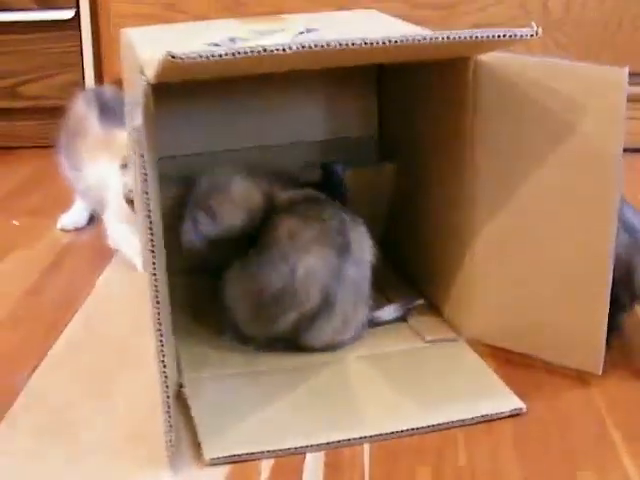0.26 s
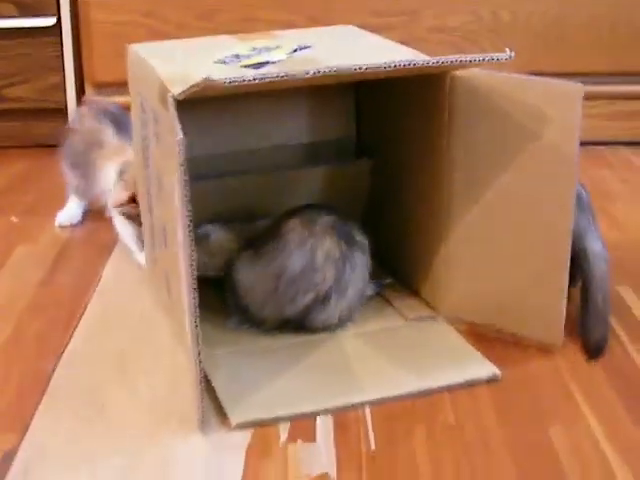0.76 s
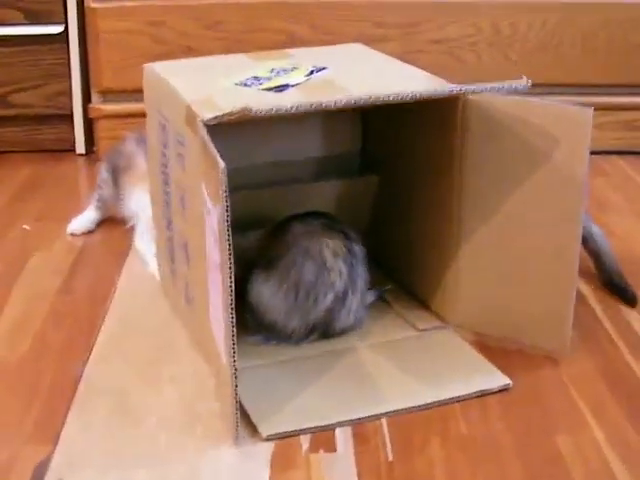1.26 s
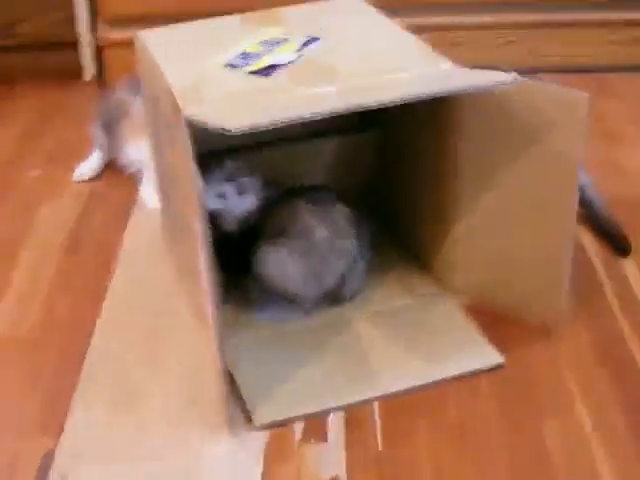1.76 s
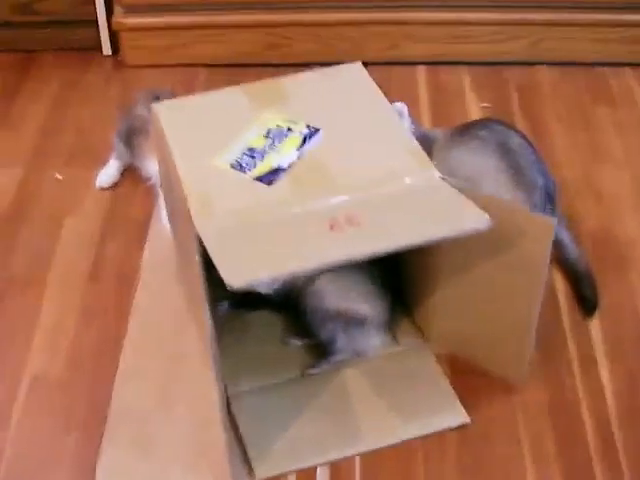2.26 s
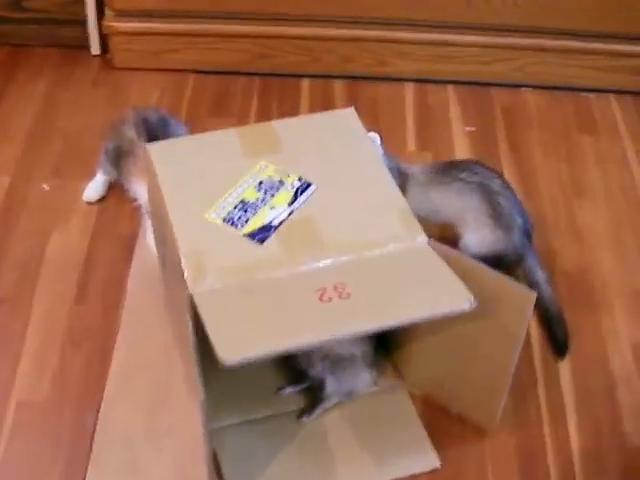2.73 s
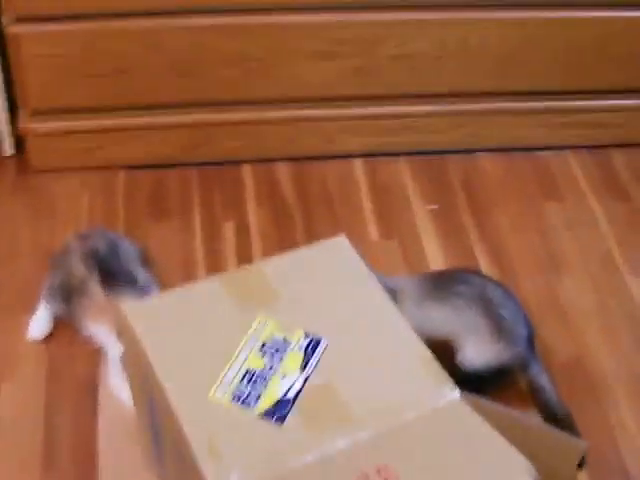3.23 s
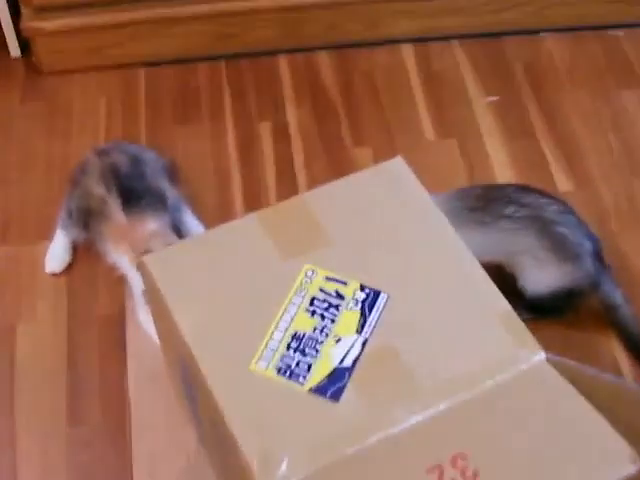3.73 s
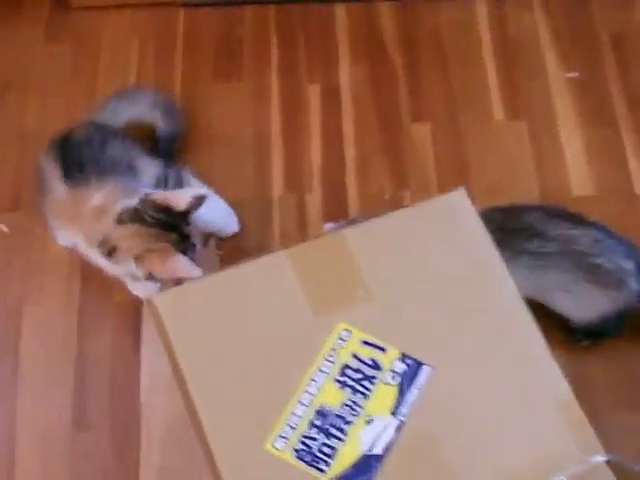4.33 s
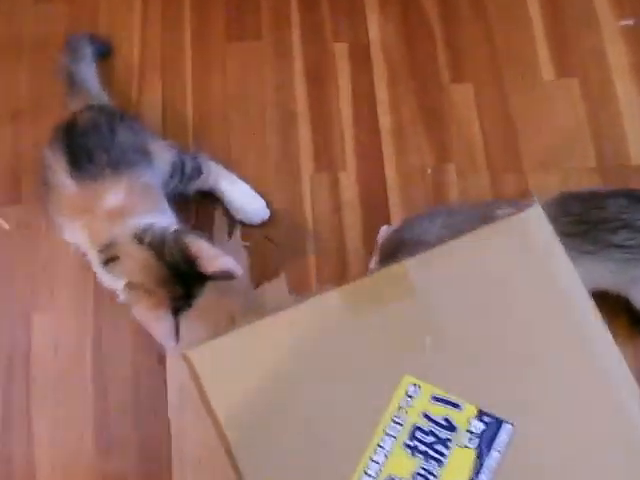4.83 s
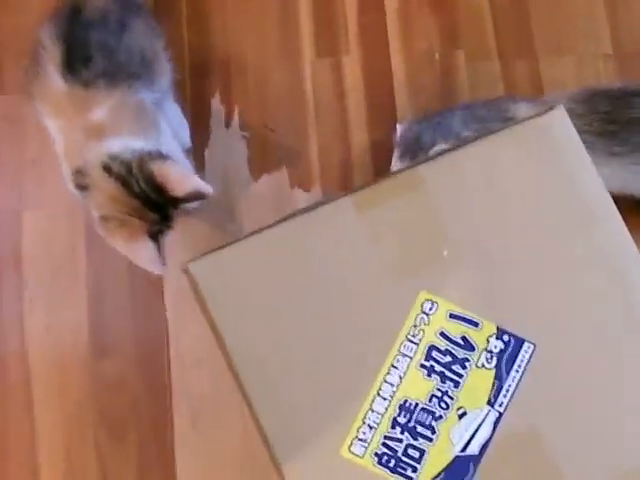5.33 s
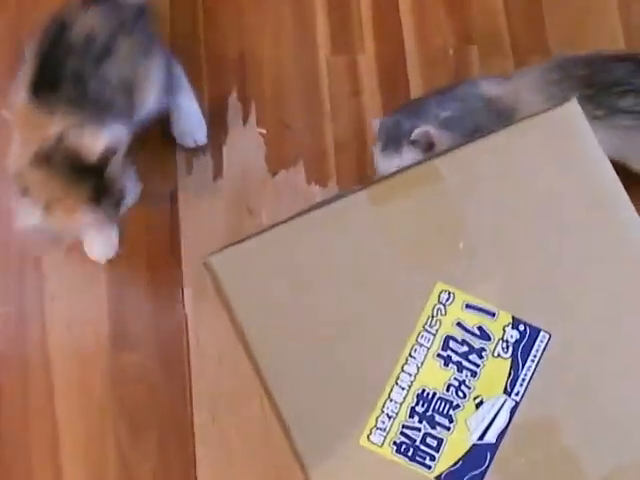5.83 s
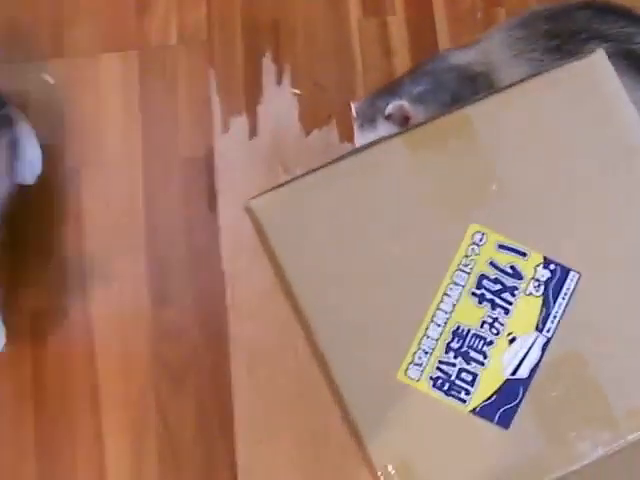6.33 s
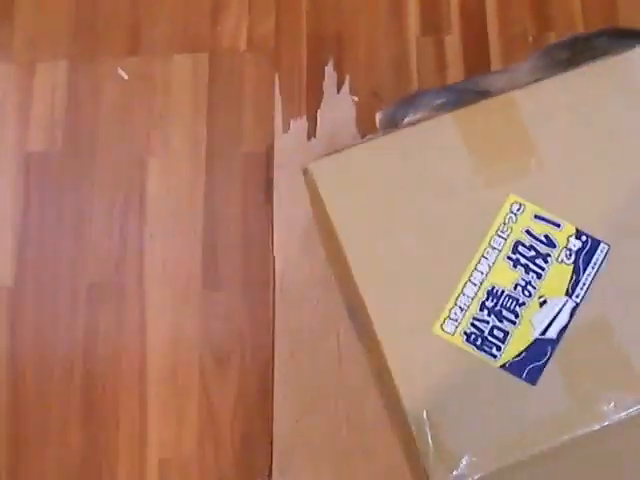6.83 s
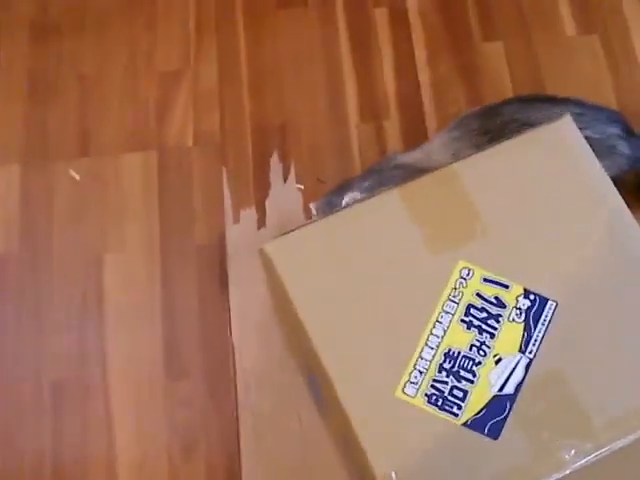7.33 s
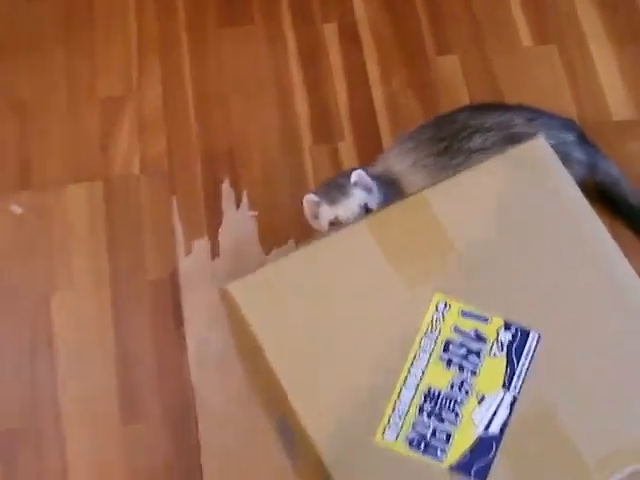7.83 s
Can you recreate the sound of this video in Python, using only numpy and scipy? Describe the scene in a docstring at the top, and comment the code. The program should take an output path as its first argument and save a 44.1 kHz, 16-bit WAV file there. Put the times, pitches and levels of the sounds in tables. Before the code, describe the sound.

Small animals scrabble in and around a cardboard box on a wooden floor, heard close up in a room. A low hollow bump opens straight into dense, dry scratching: claws and fur drag over the cardboard, paws swipe, claws catch with sharp ticks, and bodies knock softly against the walls. This stays busy until about 2.3 seconds, then eases. A second strong flurry comes from 3 to 3.5 seconds, followed by lighter scrapes up to 4.2 and a short scratch near 4.7. After that it is mostly quiet, with faint ticks and soft bumps from 5.4 seconds, a brief scratch around 6.5 and a weaker one at 7. A steady low room rumble with light hiss and a faint small motor whine sits behind everything. A faint low hum fades away just after 2 seconds.

```python
"""Scratchy scrabbling of small animals in and around a cardboard box on a wooden floor.
Claws and fur drag over the board in dense tiny snaps, paws swipe, claws catch and tick, and bodies
bump the walls so that the box rings low and hollow. The bustle thins out in the second half.
Behind it a small motor whines faintly in the room rumble, and a low hum fades after the first seconds."""
import sys
import numpy as np
from scipy import signal
from scipy.fft import rfft, irfft, next_fast_len
from scipy.io import wavfile

SR = 44100
rng = np.random.default_rng(int(sys.argv[2]) if len(sys.argv) > 2 else 0)


def dump_mix(stems):
    """Bounce the given channels to the path in sys.argv[1] as a 16-bit WAV at rate SR."""
    frames = np.atleast_2d(stems).T  # one column per channel
    limited = np.clip(frames, -1, 1)  # hard clip at full scale
    pcm = np.round(limited * 32767).astype(np.int16)
    wavfile.write(sys.argv[1], SR, pcm)


N = 356328

# Strokes over the board; sizzle and wall ride on the stroke's level, the slope rolls off below its colour:
# peak_s, peak_db, rise_s, fall_s, colour_hz, sizzle_db, wall_db, low_slope_db_per_octave
DRAG_STROKES = [(0.003, -31, .05, 0.051, 4020, -2, 4.5, 12),
                (0.17, -18.5, 0.044, 0.073, 3150, -4.5, -24, 18),
                (0.25, -29, 0.093, 0.045, 3670, 2, 2.5, 26),
                (0.338, -22.5, 0.061, .1, 4060, -2.5, -6.5, 15),
                (0.395, -19, 0.091, 0.11, 4000, 4, -19.5, 13),
                (0.465, -27.5, .1, .035, 3550, 10.5, -34, 10),
                (0.521, -21, 0.032, 0.052, 3900, -3.5, -5, 11), (0.645, -28, 0.079, 0.16, 3560, -2, -9, 13),
                (0.74, -28, 0.081, 0.25, 3900, -8, 3, 20), (0.83, -21, 0.23, 0.2, 3570, 0, -30, 16.5),
                (0.9, -24, 0.32, 0.075, 3760, -6.5, -16, 7), (0.99, -31, 0.11, 0.16, 4330, 4.5, -18, 2.5),
                (1.15, -19, 0.026, 0.11, 3770, 0, -43, 9), (1.215, -23, 0.059, .1, 3470, -13, -16, 11),
                (1.285, -23, 0.12, 0.055, 4000, -6, -13.5, 15),
                (1.37, -22, 0.042, 0.087, 4380, -3, -18, 7.5), (1.42, -29, 0.12, .14, 4500, -2.5, 1.5, 2.5),
                (1.605, -26, 0.069, 0.055, 4600, -4, -12.5, 7.5),
                (1.67, -33.5, 0.045, 0.32, 4000, -11, -9, 4),
                (1.78, -22.5, .2, 0.11, 4080, -4.5, -20.5, 10), (1.89, -33, 0.12, .08, 4270, -2, -7, 7),
                (2.09, -39, 0.34, 0.7, 3500, -1, -10, 15), (2.25, -22, 0.056, 0.096, 3080, -3.5, -24.5, 29),
                (2.285, -29, .05, 0.066, 3760, -10, -12, 8), (2.44, -34.5, .06, 0.059, 3420, -10, -18, 17),
                (2.59, -35.5, 0.078, 0.064, 3380, 4.5, -17, 12), (2.7, -44.5, 0.12, 0.36, 4050, 8, -21, 7),
                (3.06, -23, 0.047, .2, 3740, -8.5, -33, 15),
                (3.125, -18.5, 0.067, 0.13, 3620, -12, -27, 13.5),
                (3.191, -16, 0.11, .09, 3720, -6.5, -29, 17.5),
                (3.329, -22.5, 0.02, 0.17, 3830, -7.5, -20.5, 9),
                (3.41, -27.5, .1, 0.13, 3940, -7, -9.5, 24), (3.51, -36, 0.16, 0.47, 4150, -3, -25, 6),
                (3.725, -29.5, 0.041, 0.24, 4700, -6, -26, 9),
                (3.795, -28, 0.11, 0.14, 3850, -2.5, -28, 14.5),
                (3.87, -38, 0.14, 0.32, 3700, -6.5, -11, -1), (4.12, -28, 0.055, .15, 4020, -8, -17, 7.5),
                (4.19, -32, 0.049, 0.08, 3800, -6, -19, 11), (4.66, -24, 0.044, 0.083, 3920, -3.5, -23, 10),
                (4.77, -31, 0.041, 0.086, 4060, -5.5, -19, 10),
                (6.01, -40.5, 0.068, 0.094, 4070, 0, -22, 8), (6.23, -39, 0.031, 0.056, 5030, 6.5, -23, 15),
                (6.548, -27.5, 0.039, 0.032, 6000, -3.5, -33, 9),
                (6.565, -26, .04, 0.084, 3720, -4, -42, 17), (7.02, -41.5, .09, 0.069, 3730, -6, -13, 11)]
# Faint shuffling between strokes, with fur sizzle riding on its level: time_s, level_db, sizzle_db
SHUFFLE_BED = [(0.0, -48, 0), (.12, -43.5, 9), (.6, -39.5, -12), (1.1, -45.5, 16), (1.6, -45, 20),
               (2.0, -45.5, 11), (2.4, -48.5, -4), (3.0, -46.5, -2.5), (3.3, -38, 10), (3.7, -45, 5),
               (4.05, -46.5, 7), (4.5, -45, -9), (4.9, -50, -8), (5.96, -52, -9), (6.35, -54.5, -1),
               (6.9, -50.5, -10), (7.15, -54, -13), (7.74, -51.5, -11), (8.08, -50, -6)]
# Tone of the rubbed box wall drumming: frequency_hz, level_db
WALL_SPECTRUM = [(350, -9.5), (500, -5.5), (900, 2), (1500, -5), (2200, 2), (3200, -37)]
# Tone of the fur's sizzle: frequency_hz, level_db
FUR_SPECTRUM = [(6000, -43), (7500, 2.5), (9500, 3.5), (12500, 3), (14000, 0.5)]
# Stereo image of the dragging, 1 centred and 0 wide: frequency_hz, left_right_likeness
DRAG_LIKENESS = [(500, 0.83), (1200, 1), (2500, 0.43), (4000, 0.025), (6500, 0.028), (9000, 0.059),
                 (13000, 0.35)]
# Where the animals are, positive to the left: time_s, pan_db
ANIMAL_PAN = [(0.0, -0.5), (1.0, -0.6), (1.2, 1.5), (1.9, 0.7), (2.65, 2.5), (3.3, 1.4), (3.65, -.5),
              (4.1, 0), (4.6, 1), (6.5, -1), (8.08, 3)]
# Claws catching, treble relative to the peak: start_s, peak_db, colour_hz, treble_db
CLAW_TICKS = [(0.0472, -15, 1470, -7), (0.1479, -10.5, 3300, 4), (0.245, -13, 4570, -4),
              (0.5144, -8.5, 2460, 7.5), (0.673, -18, 4160, 1), (0.7338, -17, 4200, -6),
              (0.808, -14.5, 3500, 10.5), (0.8247, -16, 3800, 5), (1.3543, -13, 3700, 7.5),
              (1.3632, -10, 4180, -3), (1.605, -13, 4800, -5), (1.7864, -14, 4120, 4),
              (1.8776, -15, 4260, -10), (2.797, -28, 1980, 8), (3.0425, -11.5, 3550, -2),
              (3.1096, -7.5, 3500, 1), (3.3253, -4.5, 3720, -0.5), (3.3548, -9, 4100, -8),
              (3.429, -11, 3860, -0.5), (3.6466, -34, 2530, 14), (3.9396, -26, 3610, -12),
              (4.1216, -9, 3460, -10), (4.4462, -24.5, 3320, -3), (4.7606, -12.5, 3980, -1),
              (4.7804, -25, 4200, -2), (5.507, -33.5, 2520, 8), (5.803, -35, 1960, 17.5),
              (6.045, -33, 2380, 10), (6.4375, -29.5, 2280, 12), (6.561, -23, 4000, 0),
              (7.069, -31, 3350, 11.5)]
# Quick paw swipes, treble relative to the peak: start_s, peak_db, colour_hz, treble_db, contact_s
PAW_SWIPES = [(0.235, -20, 2850, 10, 0.0047), (0.29, -25, 3190, -1, 0.035),
              (0.3263, -17.5, 2450, 10, 0.015), (0.52, -12, 4720, 5, 0.0041),
              (0.629, -12.5, 3000, 9, 0.011), (0.7562, -22, 4200, -4, 0.01), (1.147, -26, 2750, 11, 0.019),
              (1.2041, -20, 4120, -11, 0.013), (1.259, -14, 4150, -2, 0.0044),
              (1.3809, -16, 4730, 3.5, 0.011), (1.4538, -20, 4770, 3.5, 0.022),
              (1.5778, -30, 4610, 3, 0.015), (1.6665, -33, 5300, -3, 0.011), (1.716, -18, 3840, 3, 0.0054),
              (2.5586, -39, 3340, 14, 0.018), (3.716, -21, 4700, 2, 0.017), (3.7761, -19, 3950, -9, 0.012),
              (3.8628, -22, 3200, 2.5, 0.012), (4.1686, -19.5, 3250, 1, 0.01),
              (4.6501, -19.5, 3870, 2, 0.014), (5.4082, -32.5, 1540, 3.5, 0.02),
              (5.9987, -31, 3460, 8.5, 0.01), (6.2166, -42, 5070, 0, 0.013), (6.369, -35, 3850, 7, 0.0067),
              (6.5864, -26.5, 3230, -2, 0.009), (7.0076, -29.5, 3350, 2, 0.0095)]
# Bodies hitting the box; each spot favours a pitch: start_s, level_db, favoured_hz, upper_modes_db
BODY_BUMPS = [(0.046, -14.5, 117, -23), (0.149, -32, 308, -2), (0.237, -26.5, 207, -2.5),
              (0.333, -27.5, 210, 6.5), (0.394, -36.5, 270, 6), (0.511, -24.5, 217, -7),
              (0.638, -35, 257, -3), (0.673, -26.5, 200, -5), (0.741, -32.5, 244, 1.5),
              (1.249, -39, 226, 0), (1.539, -29, 122, -27), (2.059, -36.5, 248, -7), (2.808, -36, 180, -18),
              (3.116, -34, 255, -16), (3.352, -32, 246, -7), (3.37, -46, 308, -15), (4.217, -32, 125, -25),
              (4.431, -40, 250, -15), (4.74, -38.5, 238, -15), (5.503, -43, 193, -8), (5.8, -35, 127, -24),
              (6.438, -36, 180, -12), (6.471, -43, 271, -15), (7.065, -37, 152, -23)]
# Ringing modes of the box: pitch_hz, gain_db, t60_s
BOX_MODES = [(121.6, -9.5, 0.19), (189.8, -0.5, 0.14), (237.5, 1, 0.12), (276, 6, 0.069), (522.6, -2, 0.11),
             (740, -8.5, 0.078), (1083, -3.5, 0.053), (1300, 2, 0.018)]
# Partials of the motor whine: harmonic_number, gain_db
MOTOR_PARTIALS = [(4, -3.5), (5, 3), (6, 1.5)]
# Fader of the motor whine: time_s, level_db
MOTOR_FADER = [(0.0, -57), (1.9, -73), (3.4, -55.5), (5.6, -61), (8.08, -56)]
# Fader of the low hum: time_s, level_db
HUM_FADER = [(0.0, -49.5), (0.6, -61), (1.06, -56.5), (1.5, -51), (2.09, -57.5), (2.25, -72), (8.08, -72)]
# Tone of the room rumble and hiss in the centre: frequency_hz, level_db
RUMBLE_MID_SPECTRUM = [(25, -37), (50, -24.5), (110, -5), (150, -5.5), (250, -3), (305, -5), (345, -19.5),
                       (560, -12.5), (800, -6.5), (1050, -11), (1400, -14.5), (3400, -14), (6500, -23.5),
                       (13000, -22.5)]
# Tone of the room rumble and hiss at the sides: frequency_hz, level_db
RUMBLE_SIDE_SPECTRUM = [(18, -56), (30, -18), (164, -3), (217, 2.5), (296, -2.5), (354, -14), (495, -14.5),
                        (2990, -16), (5010, -17.5), (7950, -26), (8590, -22.5), (12300, -24.5),
                        (14000, -66)]
# Fader of the room rumble: time_s, level_db
RUMBLE_FADER = [(0.0, -41), (0.56, -41), (2.25, -42), (3.8, -43), (5.24, -45.5), (6.6, -43.5), (8.08, -45)]

SNAPS_PER_S, SNAP_SPREAD_DB = 5000, 1.5
STROKE_SWING_DB = 20   # gained within the rise, lost within the fall
STROKE_ROUNDNESS = 1.037   # 1 is a pointed peak, 2 a round one
SHUFFLE_HZ, SHUFFLE_WALL_DB, SHUFFLE_SLOPE_DB_OCT = 3370, -8, 6.5
BIG_PANEL_LAG_S = .004   # the big low panels answer late


def dragging(high_slope_db_oct, stutter_db, flicker_db, wander_db, hollow_gain):
    """Fibres slip in dense tiny snaps; the board colours them round a peak that moves with the stroke."""
    level_db, colour_hz, sizzle_db, wall_db, low_slope_db_oct = stroke_curves()
    pan_db, = in_time(ANIMAL_PAN)
    snap_db = SNAP_SPREAD_DB * np.minimum(rng.exponential(1, (2, N)), 5)
    strengths = from_db(snap_db) * rng.choice([-1, 1], (2, N))
    slips = rng.random((2, N)) < SNAPS_PER_S / SR
    size = next_fast_len(N, True)
    mid, side = rfft(strengths * slips, size)
    hz = np.maximum(np.fft.rfftfreq(size, 1 / SR), 1)
    alike = np.clip(at_hz(DRAG_LIKENESS, hz), -1, 1)
    snaps = np.sqrt(1 + alike) * mid + np.sqrt(1 - alike) * side * [[1], [-1]]
    board = 0
    for centre_hz in 1400 * 2 ** np.arange(0, 2.6, 1 / 7):
        share = np.cos(np.pi / 2 * np.clip(7 * np.log2(hz / centre_hz), -1, 1)) ** 2
        band = irfft(snaps * share, size)[:, :N]
        octaves = np.log2(centre_hz / colour_hz)
        low_slope = np.maximum(low_slope_db_oct, 0) * (1 - 0.2 * octaves)   # steeper further down
        colour_db = np.where(octaves < 0, low_slope, -high_slope_db_oct) * octaves
        # each narrow band flickers and stands out for a while as the claw finds another spot
        board = board + band * from_db(colour_db + flicker_db * drift(38) + wander_db * drift(7))
    # the rubbed wall sounds hollow: the box modes stand out of its drumming
    hollow = 1 + sum(hollow_gain * from_db(db) / (1 + ((hz - mode_hz) * t60 / 2) ** 2)
                     for mode_hz, db, t60 in BOX_MODES)
    wall = rms_one(irfft(snaps * hollow * from_db(at_hz(WALL_SPECTRUM, hz)), size)[:, :N])
    sizzle = rms_one(irfft(snaps * from_db(at_hz(FUR_SPECTRUM, hz)), size)[:, :N])
    mix = rms_one(board) + from_db(wall_db) * wall + from_db(sizzle_db) * sizzle
    # the claws skip, so the pressure stutters within a stroke
    return mix * panned(from_db(level_db + stutter_db * drift(29)), pan_db)


def stroke_curves():
    """Level and tone of the drag: strokes swell and fall, powers add, and louder ones set the tone."""
    t = np.arange(0, N / SR + .001, .001)
    peak_s, peak_db, rise_s, fall_s, *stroke_tone = np.transpose(DRAG_STROKES)[:, :, None]
    away = np.abs(t - peak_s) / np.maximum(np.where(t < peak_s, rise_s, fall_s), .005)
    stroke_power = from_db(2 * (peak_db - STROKE_SWING_DB * away ** STROKE_ROUNDNESS))
    time_s, shuffle_db, sizzle_db = np.transpose(SHUFFLE_BED)
    shuffle_power = from_db(2 * np.interp(t, time_s, shuffle_db))
    shuffle_tone = SHUFFLE_HZ, np.interp(t, time_s, sizzle_db), SHUFFLE_WALL_DB, SHUFFLE_SLOPE_DB_OCT
    total_power = stroke_power.sum(axis=0) + shuffle_power
    tone = [(np.sum(stroke_power * stroke, axis=0) + shuffle_power * shuffle) / total_power
            for stroke, shuffle in zip(stroke_tone, shuffle_tone)]
    return in_time(np.transpose([t, 10 * np.log10(total_power), *tone]))


def paw_lifts(depth_db, lead_s):
    """A gain that ducks the drag: the paw eases off the board just before each swipe lands."""
    t, duck_db = np.arange(N) / SR, np.zeros(N)
    for lands_s, *_ in PAW_SWIPES:
        lift = np.interp(t, [lands_s - lead_s, lands_s - .003, lands_s], [0, 1, 0])
        duck_db = np.minimum(duck_db, -depth_db * lift)
    return from_db(duck_db)


def claw_hits(hits, t60_s, width_share, crack_gain):
    """A sharp crack, then a rattle that holds while the claw is in contact and dies away."""
    out, t = np.zeros((2, N)), np.arange(4000) / SR
    highpass = signal.butter(4, 8300, "high", fs=SR, output="sos")
    for start_s, peak_db, colour_hz, treble_db, contact_s in hits:
        rattle = from_db(-60 * np.maximum(t - contact_s, 0) / t60_s)
        crack = crack_gain * from_db(-60 * t / 0.0039)
        burst = rng.standard_normal(len(t)) * (rattle + crack)
        body = resonance(burst, colour_hz, width_share * colour_hz)
        treble = signal.sosfilt(highpass, burst)
        hit = body / np.abs(body).max() + from_db(treble_db) * treble / np.abs(treble).max()
        pan_db = np.interp(start_s, *np.transpose(ANIMAL_PAN))
        at = round(start_s * SR)
        out[:, at:at + len(t)] += panned(from_db(peak_db) * hit, pan_db)[:, :N - at]
    return out


def box_bumps(falloff_db_oct):
    """A soft blow sets the box modes ringing, most of all those near the favoured pitch."""
    start_s, level_db, favoured_hz, upper_db = np.transpose(BODY_BUMPS)
    at, out = np.round(start_s * SR).astype(int), np.zeros(N)
    chance_db = rng.normal(0, 2.5, (len(BODY_BUMPS), len(BOX_MODES)))
    for k, (hz, mode_db, t60) in enumerate(BOX_MODES):
        big_panel = hz < 400
        # a harder contact reaches the small upper panels as well
        reach_db = -falloff_db_oct * np.abs(np.log2(hz / favoured_hz)) if big_panel else upper_db
        lag = round(BIG_PANEL_LAG_S * SR) if big_panel else 0
        blows = np.full(N, 1e-18)
        blows[at + lag] = (-1) ** k * from_db(level_db + mode_db + chance_db[:, k] + reach_db)
        decay, angle = from_db(-60 / (t60 * SR)), 2 * np.pi * hz / SR
        out += signal.lfilter([0, np.sin(angle)], [1, -2 * decay * np.cos(angle), decay * decay], blows)
    # a small box radiates little below its lowest mode
    return signal.sosfilt(signal.butter(4, 75, "high", fs=SR, output="sos"), out)


def room_tail(x, t60_s):
    """The room answers with a short diffuse tail, a separate one in each channel."""
    t = np.arange(SR // 2) / SR
    tail = rng.standard_normal((2, len(t))) * from_db(-60 * t / t60_s) * (t > .004)
    tail /= np.sqrt(np.sum(tail ** 2, axis=1, keepdims=True))
    return signal.fftconvolve(x, tail, axes=1)[:, :N]


def motor_whine(base_hz):
    """A small motor sings on three upper harmonics, each wavering in level."""
    level_db, = in_time(MOTOR_FADER)
    phase = 2 * np.pi * np.cumsum(base_hz * (1 + .0025 * drift(3))) / SR
    return sum(from_db(level_db + db + 3 * drift(5)) * np.sin(k * phase) for k, db in MOTOR_PARTIALS)


def low_hum(pitch_hz):
    """One low tone that wavers in pitch and level, then fades."""
    level_db, = in_time(HUM_FADER)
    phase = 2 * np.pi * np.cumsum(pitch_hz * (1 + 0.029 * drift(3.8))) / SR
    return np.sqrt(2) * np.sin(phase) * from_db(level_db + 2.2 * drift(4.7))


def room_rumble(side_db):
    """A wide bed of rumble and hiss, from centre noise and side noise."""
    level_db, = in_time(RUMBLE_FADER)
    mid, side = rms_one(coloured(RUMBLE_MID_SPECTRUM)), rms_one(coloured(RUMBLE_SIDE_SPECTRUM))
    return from_db(level_db) * (mid + from_db(side_db) * side * [[1], [-1]])


def from_db(db):
    """dB to gain."""
    return 10 ** (np.asarray(db) / 20)


def rms_one(x):
    """Scaled to rms 1."""
    return x / np.sqrt(np.mean(x ** 2) + 1e-20)


def in_time(rows):
    """Automation curves: each column after the time, one value per sample."""
    time_s, *columns = np.transpose(rows)
    return [np.interp(np.arange(N) / SR, time_s, column) for column in columns]


def at_hz(points, hz):
    """A curve read on a log-frequency axis."""
    point_hz, values = np.transpose(points)
    return np.interp(np.log(hz), np.log(point_hz), values)


def panned(x, pan_db):
    """Left louder than right by pan_db."""
    return np.array([x * from_db(pan_db / 2), x * from_db(-pan_db / 2)])


def drift(rate_hz):
    """Slow random modulation: noise through a double one-pole low-pass, spread 1."""
    r = np.exp(-80 * np.pi * rate_hz / SR)   # one step per 40 samples
    slow = signal.lfilter([1], [1, -2 * r, r * r], rng.standard_normal(N // 40 + 2002))[2000:]
    return np.interp(np.arange(N) / 40, np.arange(len(slow)), rms_one(slow))


def resonance(x, hz, width_hz):
    """Two-pole band-pass with gain 1 on top."""
    r = np.exp(-np.pi * width_hz / SR)
    feedback = [1, -2 * r * np.cos(2 * np.pi * hz / SR), r * r]
    return signal.lfilter(np.array([1, 0, -1]) * (1 - r * r) / 2, feedback, x)


def coloured(spectrum):
    """Steady noise with the given spectrum."""
    hz = np.maximum(np.fft.rfftfreq(N, 1 / SR), 1)
    return irfft(rfft(rng.standard_normal(N)) * from_db(at_hz(spectrum, hz)), N)


def scene():
    """The scrabbling and its room tail up front; motor, hum and rumble behind."""
    drag = dragging(high_slope_db_oct=8.0, stutter_db=1.0, flicker_db=2.0, wander_db=2.0, hollow_gain=0.96)
    drag *= paw_lifts(depth_db=4, lead_s=.016)
    catches = [(*tick, 0) for tick in CLAW_TICKS]   # a tick has no contact time
    ticks = claw_hits(catches, t60_s=0.029, width_share=0.45, crack_gain=1.5)
    swipes = claw_hits(PAW_SWIPES, t60_s=0.051, width_share=0.52, crack_gain=0.98)
    box = drag + ticks + swipes + box_bumps(falloff_db_oct=21.5)
    tail = from_db(-12.5) * room_tail(box, t60_s=0.072)
    background = room_rumble(side_db=-1) + motor_whine(base_hz=171.7) + low_hum(pitch_hz=73.7)
    mix = box + tail + background
    # a slight scoop in the low mids, likely a floor echo, hollows all of it
    return mix - 0.09 * resonance(mix, hz=382, width_hz=240)


def record(dry):
    """The microphone's tone: a deep narrow notch in the treble, and a steep cut at the top."""
    notched = dry
    for _ in range(2):
        notched = notched - resonance(notched, hz=7878, width_hz=1690)
    return signal.sosfilt(signal.ellip(12, .5, 55, 13540, fs=SR, output="sos"), notched)


dry = scene()
out = record(dry)
dump_mix(out)
```